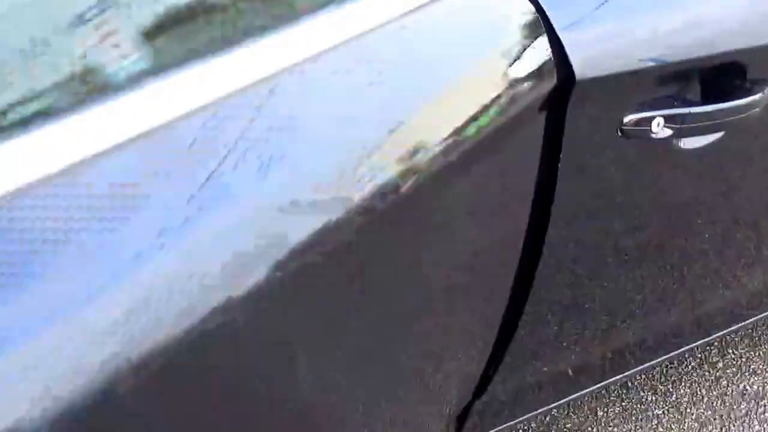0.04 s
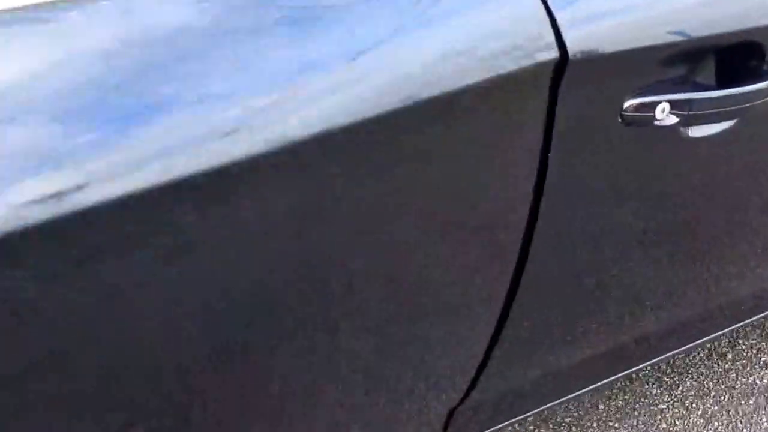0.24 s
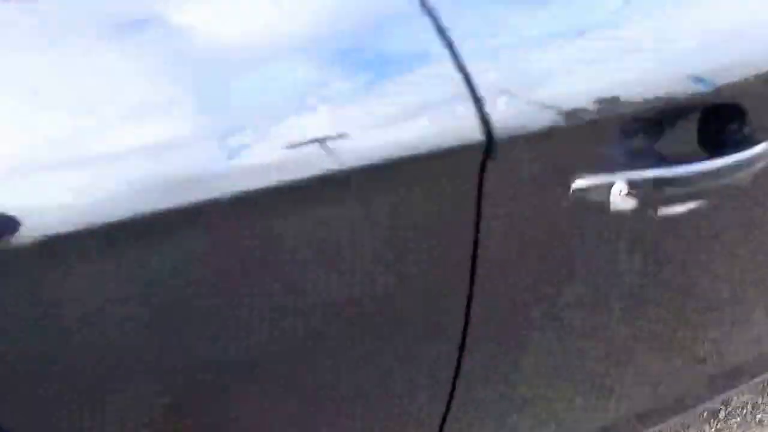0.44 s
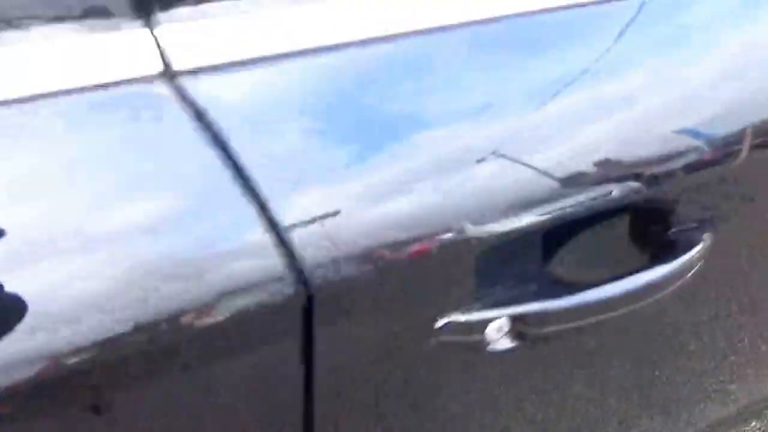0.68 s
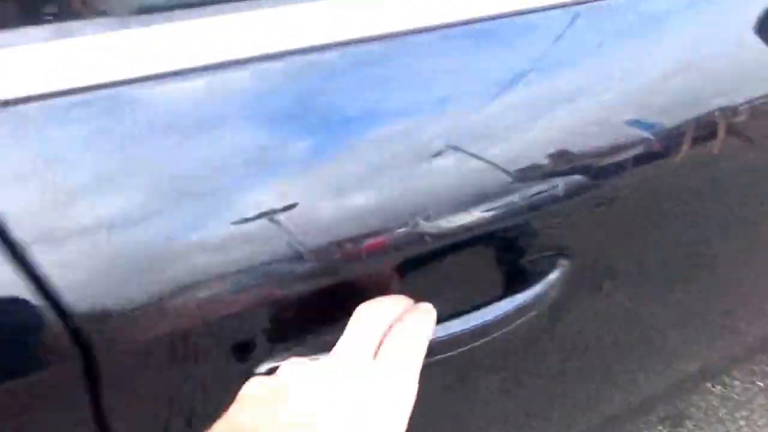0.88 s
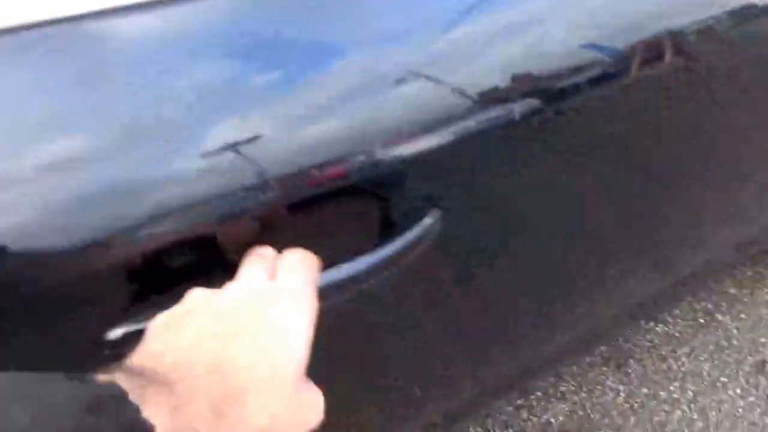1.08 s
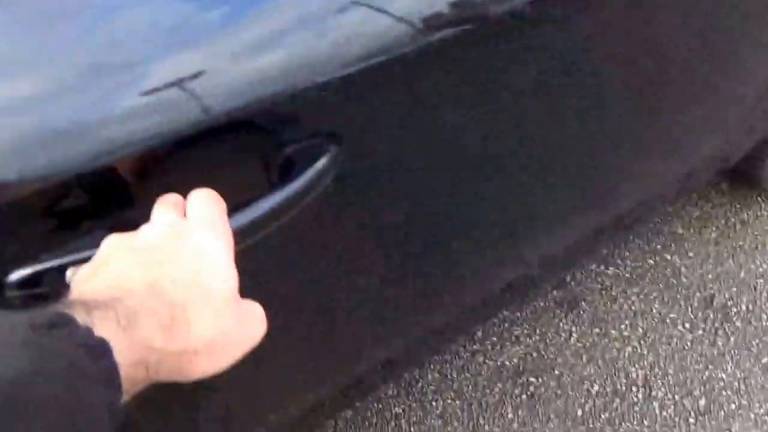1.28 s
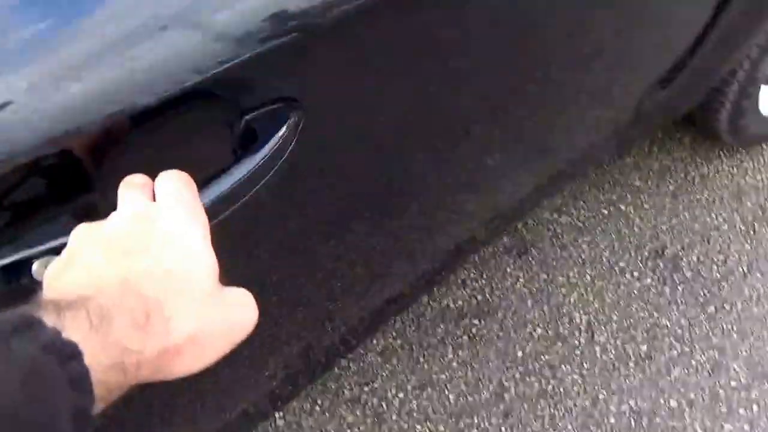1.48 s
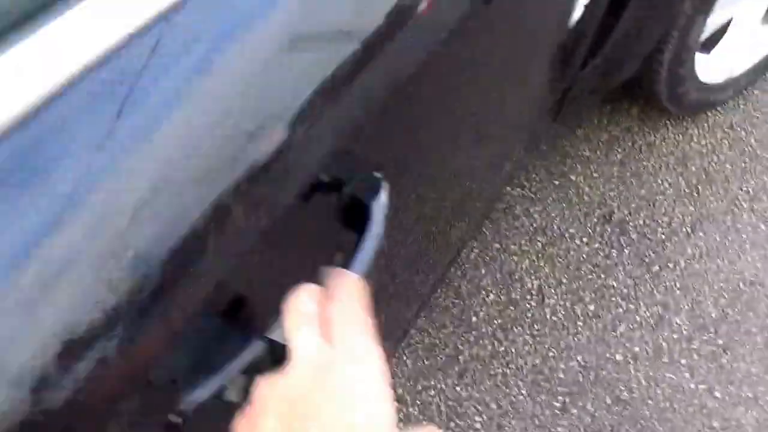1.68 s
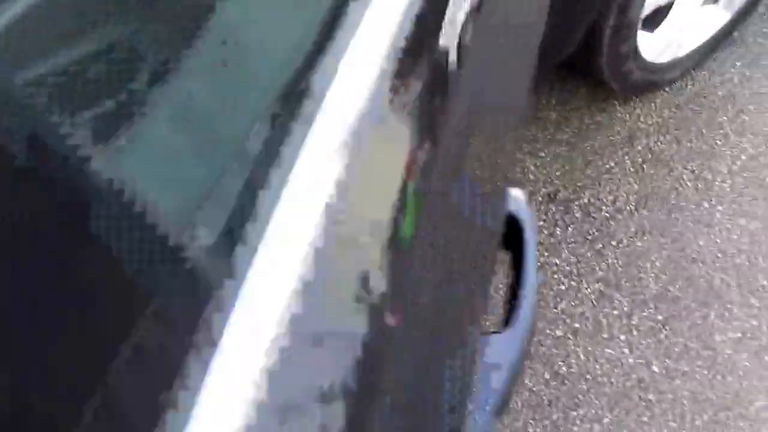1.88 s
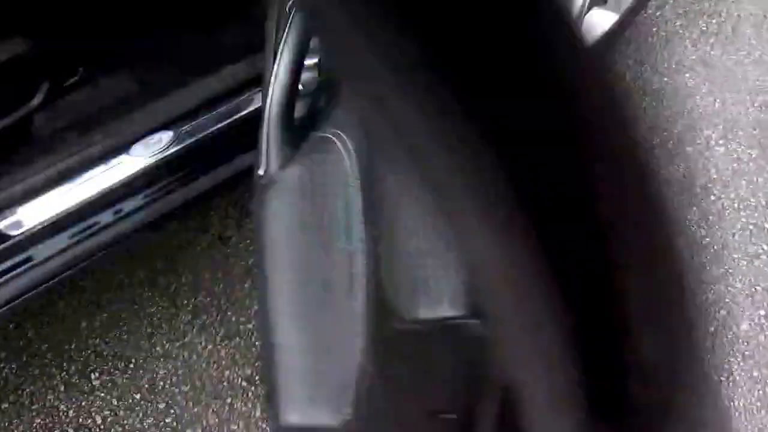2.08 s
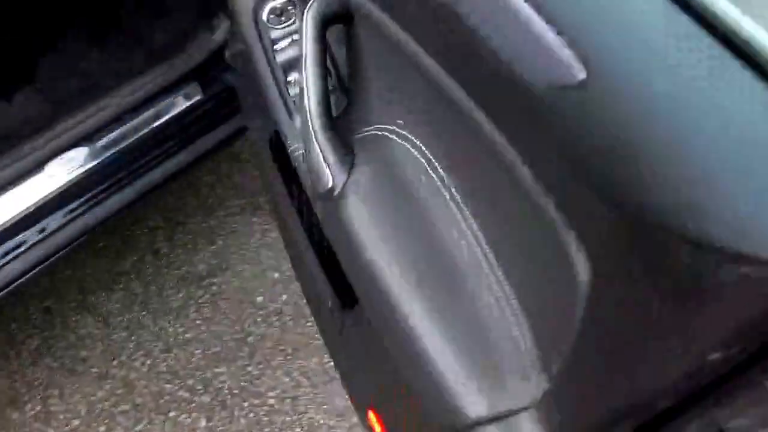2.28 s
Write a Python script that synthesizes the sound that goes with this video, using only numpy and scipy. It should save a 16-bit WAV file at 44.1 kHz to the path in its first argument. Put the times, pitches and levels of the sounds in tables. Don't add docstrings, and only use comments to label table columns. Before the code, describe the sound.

Close handheld stereo microphone in an open car park: one solid door slam, slight ticks, a muffled handle clunk and soft latch click, then a bright handle snap and rattling ticks, with low traffic roar behind.

```python
import sys
import numpy as np
from scipy import signal
from scipy.io import wavfile

SR = 44100
rng = np.random.default_rng(int(sys.argv[2]) if len(sys.argv) > 2 else 0)


def nominal_scale(level):
    x = np.asarray(level, float) / 20
    return 10 ** x


def dump_mix(stems):
    frames = np.atleast_2d(stems).T
    limited = np.clip(frames, -1, 1)
    pcm = np.round(limited * 32767).astype(np.int16)
    wavfile.write(sys.argv[1], SR, pcm)


N = 103502

# (time [s], peak level [dB], knock frequency [Hz], knock T60 [s])
SLAM = [
    (.4233, -12.5, 1310, 0.014),
    (.4246, -2, 660, 0.0032),
    (.4305, -10, 1420, 0.0077),
    (.4352, -10.5, 553, 0.05),
    (.4415, -8.5, 546, 0.028),
    (.4472, -7, 800, 0.0085),
    (.4636, -6.5, 831, 0.037),
    (.518, -21, 360, 0.015),
]
# (frequency [Hz], level [dB], T60 [s])
SLAM_MODES = [(124, -7.5, 0.16), (188, -17, 0.2), (291, -4, 0.2), (350, -8.5, 0.27), (800, -8, 0.17),
              (552, -9, 0.25), (723, -11, 0.14), (1046, -7, 0.13), (1275, -14, 0.13), (3110, -24, 0.054),
              (3560, -16, .07), (4550, -23, 0.052)]
# (frequency [Hz], density [dB per Hz])
SLAM_BODY = [(30, -35), (110, -19.5), (281, -8.5), (800, -7), (2040, -17), (3080, -14), (7000, -19.5),
             (9500, -60)]


def rear_door_slam():
    return struck_part(SLAM, SLAM_MODES, SLAM_BODY, 0)


# (time [s], peak level [dB], knock frequency [Hz], knock T60 [s])
PULL = [
    (1.2295, -33, 1250, 0.018),
    (1.2415, -41, 520, 0.023),
    (1.263, -29.5, 900, 0.015),
    (1.2705, -23.5, 383, 0.031),
    (1.279, -19, 299, 0.034),
]
# (frequency [Hz], level [dB], T60 [s])
PULL_MODES = [(333, 2, 0.12), (613, -8, 0.15), (740, -29, 0.33), (1660, -22, .1)]
# (frequency [Hz], density [dB per Hz])
PULL_BODY = [(40, -28), (150, -24), (300, 1.5), (636, -5.5), (2000, -6.5), (7000, -17), (9500, -55)]


def handle_pull():
    return struck_part(PULL, PULL_MODES, PULL_BODY, 1)


# (time [s], peak level [dB], knock frequency [Hz], knock T60 [s])
FREE = [
    (1.3588, -30.5, 1884, 0.02),
    (1.3602, -32, 613, 0.017),
    (1.3642, -28.5, 455, 0.06),
    (1.374, -41.5, 800, 0.068),
]
# (frequency [Hz], level [dB], T60 [s])
FREE_MODES = [(470, -18, 0.055), (804, -3.5, 0.13), (1157, -6, 0.045), (1756, -5.5, 0.058),
              (2670, -15, .04), (3300, -29, .03), (4570, -29, .045)]
# (frequency [Hz], density [dB per Hz])
FREE_BODY = [(100, -40), (426, 3.5), (794, 1), (1300, -10.5), (2520, -0.5), (4500, -10.5), (7500, -65)]


def latch_release():
    return struck_part(FREE, FREE_MODES, FREE_BODY, 2)


# (time [s], peak level [dB], knock frequency [Hz], knock T60 [s])
SNAP = [
    (1.785, -28.5, 900, 0.022),
    (1.7912, -9, 1505, 0.012),
    (1.7925, -15, 282.6, 0.16),
    (1.803, -16.5, 938, 0.1),
    (1.8165, -21.5, 464, 0.06),
    (1.893, -33.5, 1520, 0.027),
    (1.911, -35.5, 320, 0.03),
]
# (frequency [Hz], level [dB], T60 [s])
SNAP_MODES = [(223.5, -9.5, 0.18), (338, -13.5, 0.31), (530, -11, 0.061), (623, -8.5, 0.073),
              (897, -4.5, 0.051), (945, -4.5, 0.18), (1105, -22, 0.079), (1340, -5, 0.13), (1469, 1, 0.062),
              (1708, -6, 0.08), (2400, -10, 0.044), (3130, -13.5, 0.06)]
# (frequency [Hz], density [dB per Hz])
SNAP_BODY = [(40, -62), (134, -25.5), (268, -5), (900, 1.5), (1680, -4.5), (3500, -11), (7000, -33),
             (9500, -66)]


def handle_snap():
    return struck_part(SNAP, SNAP_MODES, SNAP_BODY, 3)


# (mode level [dB], ring level [dB], ring T60 at 300 Hz [s],
# left-right difference [dB], channel correlation [0-1])
MIX = [
    (-14.5, -10, 0.31, 6, 0.88),
    (-11.5, -1.5, 0.24, 0, 0.98),
    (0, 3.5, 0.19, 1, 0.96),
    (-5, 0.5, 0.34, 0.6, 0.9),
]


def struck_part(blows, modes, body, which):
    modes_db, ring_db, ring_t60, pan_db, alike = MIX[which]
    s, db, knock_hz, knock_t60 = np.transpose(blows)
    start, size = int(s[0] * SR) - 8, SR * 3 // 4
    clicks = np.zeros((len(s), size))
    clicks[np.arange(len(s)), (s * SR).astype(int) - start] = nominal_scale(db)

    struck = 0
    for click, hz, t60 in zip(clicks, knock_hz, knock_t60):
        struck = struck - ring(click, hz, t60)
    coupling = rng.normal(0, 1, (len(s), len(modes)))
    for k, (hz, mode_db, t60) in enumerate(modes):
        struck = struck + ring(coupling[:, k] @ clicks, hz, t60) * nominal_scale(mode_db + modes_db)
    struck = signal.lfilter(*signal.butter(1, 2500, fs=SR), struck)
    struck = low_cut(struck, 191)

    since = np.maximum((np.arange(size) + start) / SR - s[:, None], 0)

    def ring_gain(hz):
        t60 = ring_t60 * (300 / hz) ** 0.56
        decay = nominal_scale(db[:, None] - 60 * since / t60)
        build_up = 1 - np.exp(-since * hz)
        dullness = 1 + (hz / 4.5 / knock_hz[:, None]) ** 4
        return np.sqrt(((decay * build_up) ** 2 / dullness).sum(0))

    dense = bands(size, body, lambda hz: alike ** (1 + hz / 900), ring_gain)
    both = struck + nominal_scale(ring_db + db.max()) * dense / np.abs(dense).max()
    out = np.zeros((2, N + size))
    out[:, start:start + size] = lean(both, pan_db)
    return out[:, :N]


def door_swing():
    centre_s, length_s = 2.21, 0.058
    air = rng.standard_normal((2, N))
    air = air[0] + 0.4 * air
    air = rms_one(signal.sosfilt(signal.butter(2, [20, 91], "band", fs=SR, output="sos"), air))
    return nominal_scale(-65.5) * air * np.exp(-((np.arange(N) / SR - centre_s) / length_s) ** 2)


# (time [s], peak level [dB], frequency [Hz], T60 [s], broad crack share [0-1])
TICKS = [(0.3783, -49, 5970, 0.027, .2), (0.422, -27, 3330, 0.016, 0.05), (0.426, -18, 4460, 0.012, 0),
         (.569, -42, 3900, 0.0053, 0.26), (.762, -48, 3500, .01, .1), (0.8698, -31.5, 10600, 0.036, 0.6),
         (0.8704, -34, 2550, 0.015, 0.44), (.9932, -52, 9000, .01, 0.1), (1.027, -53, 5500, .008, 0.2),
         (1.044, -46.5, 6500, .015, 0.35), (1.063, -30, 1990, 0.0059, 0.13), (1.062, -48, 9050, .005, .05),
         (1.068, -48, 4500, .005, 0.2), (1.088, -47, 4300, .012, .05), (1.0904, -31, 10300, 0.011, 0),
         (1.093, -48.5, 159, 0.038, 0), (1.2282, -39, 9050, 0.023, 0), (1.276, -19.5, 8700, 0.0099, 0.2),
         (1.326, -40, 8500, 0.042, .2), (1.322, -40, 2800, 0.043, 0.2), (1.62, -41.5, 570, 0.13, 0.1),
         (1.7908, -11, 9500, 0.031, 0.12), (1.8083, -20, 9900, 0.009, .03), (1.8185, -26, 9500, .006, .01),
         (1.882, -45, 9300, .006, .02), (1.906, -35, 9000, 0.0072, .1), (1.906, -39.5, 3300, .006, .05),
         (1.9172, -31.5, 8700, 0.0066, .02), (1.917, -39, 7000, 0.0051, .02), (1.936, -35, 7000, .012, 0.2),
         (1.951, -41, 8500, .006, .2), (1.9642, -21.5, 5600, 0.0039, 0.64), (1.9636, -29, 1230, .004, 0.06),
         (1.968, -38, 6100, 0.006, .5), (1.978, -42, 10000, .005, 0.1), (1.984, -32, 1590, 0.0082, .05),
         (2.001, -38.5, 3750, 0.013, .03), (2.0087, -25.5, 1720, 0.0033, 0.2),
         (2.008, -33, 9800, 0.0094, .03)]


def ticks():
    size = 4096
    out, t = np.zeros((2, N + SR)), np.arange(size) / SR
    noise = rng.standard_normal((len(TICKS), 2, size))
    for (s, db, hz, t60, crack), (mid, side) in zip(TICKS, noise):
        burst = (mid + 0.2 * side * [[1], [-1]]) * nominal_scale(-60 * t / t60)
        burst[:, 0] = 2.6
        burst = crack * burst + .3 * ring(burst, hz, 10 / hz)
        burst = low_cut(burst, .4 * hz)
        start = int(s * SR)
        out[:, start:start + size] += nominal_scale(db) * burst / np.abs(burst).max()
    return out[:, :N]


# (start [s], rise [s], fall T60 [s], RMS level [dB], lowest frequency [Hz])
RUBS = [(0.377, 0.0036, 0.12, -52, 4000), (0.42, 0.003, 0.11, -34, 2500), (0.431, 0.012, 0.11, -26.5, 2930),
        (.456, 0.0083, 0.28, -63, 3000), (.49, 0.078, 0.23, -60, 3000), (.9, 0.02, 0.31, -70, 7000),
        (1.17, .004, 0.69, -59, 3000), (1.226, 0.0032, 0.11, -43.5, 1500), (1.263, 0.011, 0.055, -36, 1500),
        (1.31, 0.0068, 0.06, -54, 7500), (1.509, 0.0091, 0.51, -58, 3350), (1.57, 0.023, 0.2, -51, 4200),
        (1.652, 0.004, 0.77, -65, 6500), (1.746, 0.062, 0.087, -48, 6660), (1.789, .002, 0.14, -38, 2000),
        (1.85, 0.017, 0.11, -48, 2000), (1.892, 0.063, 0.3, -46, 900), (1.947, 0.0027, 0.049, -56, 5000),
        (1.975, 0.029, 0.04, -49.5, 1200)]


def rubs():
    grains_per_s, spread_db, clump_db = 21000, 6.5, 1
    t, out = np.arange(N) / SR, 0
    height = nominal_scale(spread_db * np.minimum(rng.exponential(1, (2, N)), 4))
    sign = rng.choice([-1, 1], (2, N))
    present = rng.random((2, N)) < grains_per_s / SR
    clumps = np.repeat(rng.standard_normal(N // 128 + 1), 128)[:N]
    grains = height * sign * present * nominal_scale(clump_db * clumps)
    grains = grains[0] + 0.32 * grains[1] * [[1], [-1]]
    grains = grains + 1.9 * 0.86 * ring(grains, 9500, 0.00043)
    for s, rise, t60, db, low_hz in RUBS:
        shape = np.clip((t - s) / rise, 0, 1) * nominal_scale(-60 * np.maximum(t - s - rise, 0) / t60)
        rub = signal.sosfilt(signal.butter(2, low_hz, "high", fs=SR, output="sos"), grains)
        out = out + nominal_scale(db) * shape * rms_one(rub)
    return out


# (time [s], level [dB])
ROAD = [(0, -45.5), (.35, -46), (.8, -49), (1.05, -49.5), (1.5, -52), (2.35, -54)]
# (frequency [Hz], density [dB per Hz])
ROAD_COLOUR = [(25, -48), (110, -20), (250, -6), (500, -6.5), (1000, 2.5), (1630, -3.5), (4000, -36),
               (9000, -53)]
# (frequency [Hz], channel correlation [0-1])
ROAD_ALIKE = [(60, 1), (840, 0.91), (3150, 0.23), (9000, 0.27)]


def road():
    t = np.arange(N) / SR
    patchy_db, drifts_per_s = 1.64, 14

    def drift(hz):
        return nominal_scale(patchy_db * np.interp(t * drifts_per_s, np.arange(64), rng.standard_normal(64)))

    roar = rms_one(bands(N, ROAD_COLOUR, lambda hz: at_hz(ROAD_ALIKE, hz), drift))
    level = np.interp(t, *np.transpose(ROAD))
    return nominal_scale(level + 3.5) * pan(-1.5) * roar


def idling_engine():
    return nominal_scale(-70.5) * rms_one(ring(rng.standard_normal(N), 109, 0.22))


def ring(clicks, hz, t60):
    r, w = nominal_scale(-60 / (t60 * SR)), 2 * np.pi * hz / SR
    return signal.lfilter([0, np.sin(w)], [1, -2 * r * np.cos(w), r * r], clicks + 1e-18)


def bands(size, colour, alike, gain):
    out, edges = 0, 24 * 2 ** np.arange(0, 9.1, .5)
    settle = 4000
    white = rng.standard_normal((2, 2, size + settle))
    for k, (low, high) in enumerate(zip(edges, edges[1:])):
        band = signal.butter(2, [low, high], "band", fs=SR, output="sos")
        mid, side = signal.sosfilt(band, white[k % 2])[:, settle:]
        hz = np.sqrt(low * high)
        c = np.clip(alike(hz), 0, 1)
        stereo = np.sqrt(1 + c) * mid + np.sqrt(1 - c) * side * [[1], [-1]]
        out = out + nominal_scale(at_hz(colour, hz)) * gain(hz) * stereo
    return out


def low_cut(x, hz):
    return signal.sosfilt(signal.butter(3, hz, "high", fs=SR, output="sos"), x)


def lean(both, pan_db):
    middle = signal.sosfilt(signal.butter(2, [330, 6500], "band", fs=SR, output="sos"), both)
    return both + middle * (pan(pan_db) - 1)


def pan(db):
    return nominal_scale(np.array([[db / 2], [-db / 2]]))


def at_hz(points, hz):
    points = np.array(points)
    return np.interp(np.log(hz), np.log(points[:, 0]), points[:, 1])


def rms_one(x):
    return x / np.sqrt(np.mean(x ** 2) + 1e-20)


def scene():
    door = rear_door_slam() + handle_pull() + latch_release() + handle_snap()
    small = ticks() + rubs()
    at_rear = np.arange(N) / SR < 0.45
    small = np.where(at_rear, lean(small, 12), lean(small, 2.5))
    return door + door_swing() + small + road() + idling_engine()


def low_pass(x):
    return signal.sosfilt(signal.butter(12, 12380, fs=SR, output="sos"), x)


def record(dry):
    ceiling = 0.79
    hiss = rng.standard_normal((3, N))
    hiss = hiss[0] + 0.65 * hiss[1:]
    hiss = hiss + 2.01 * 0.63 * ring(hiss, 9500, 0.00039)
    mix = ceiling * np.tanh((dry + nominal_scale(-73.5) * hiss) / ceiling)
    mix = signal.sosfilt(signal.cheby1(13, .5, 11050, fs=SR, output="sos"), mix)
    return low_pass(mix)


dry = scene()
out = record(dry)
dump_mix(out)
```